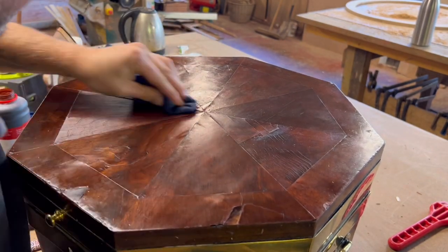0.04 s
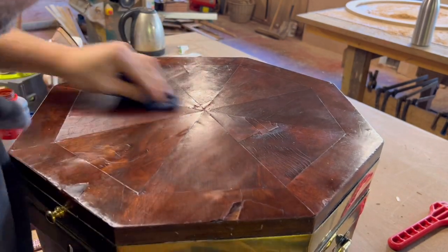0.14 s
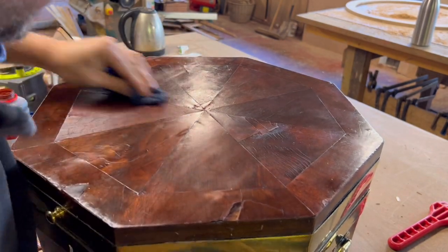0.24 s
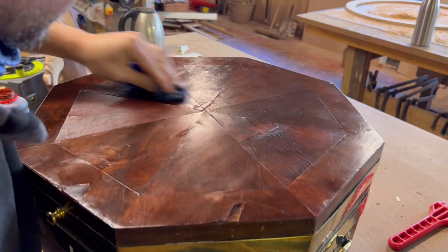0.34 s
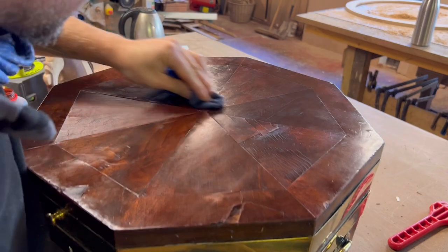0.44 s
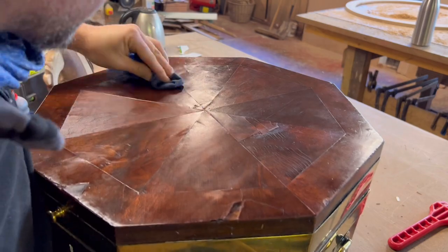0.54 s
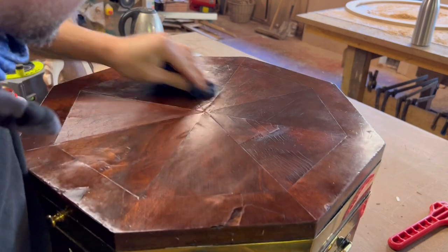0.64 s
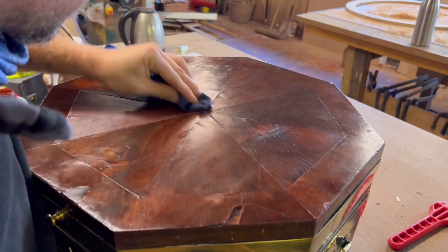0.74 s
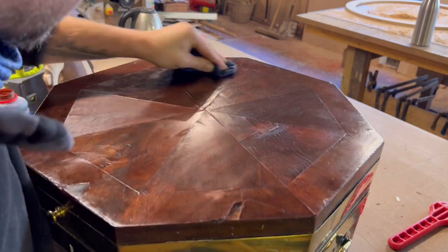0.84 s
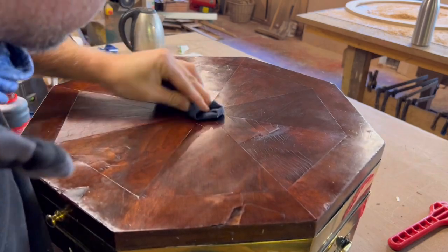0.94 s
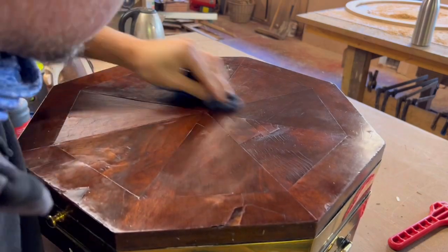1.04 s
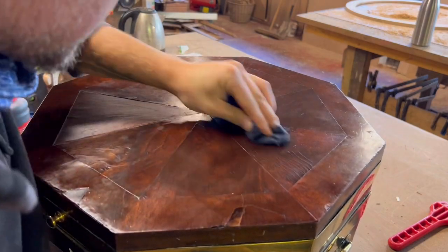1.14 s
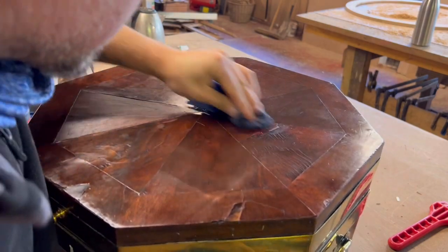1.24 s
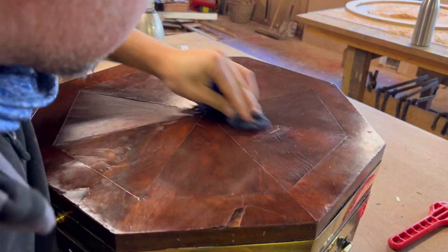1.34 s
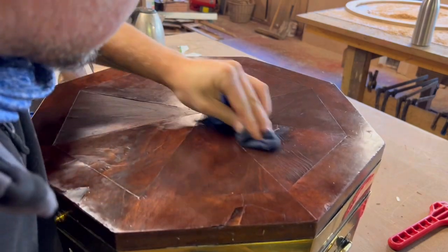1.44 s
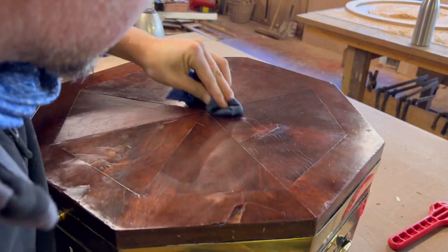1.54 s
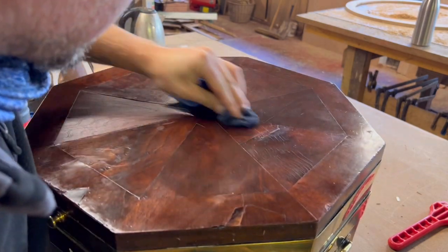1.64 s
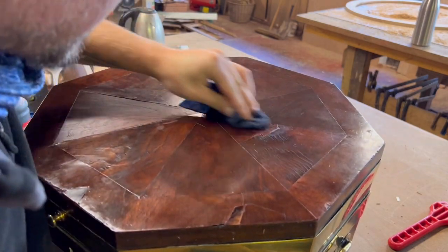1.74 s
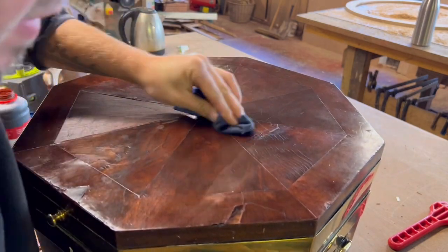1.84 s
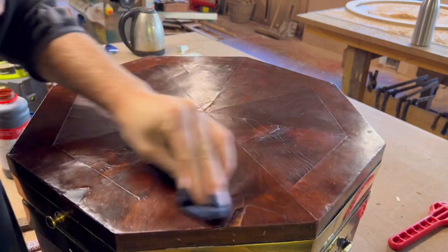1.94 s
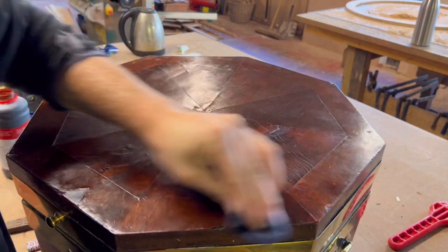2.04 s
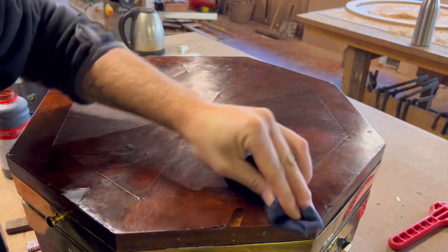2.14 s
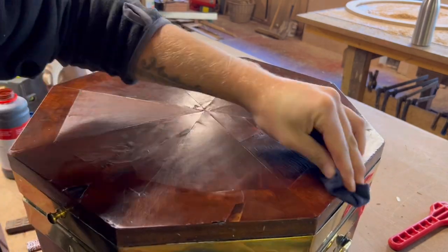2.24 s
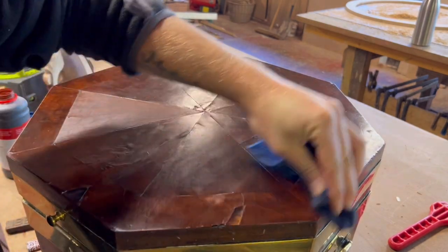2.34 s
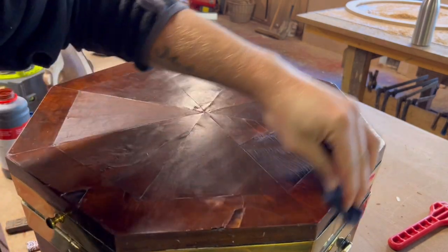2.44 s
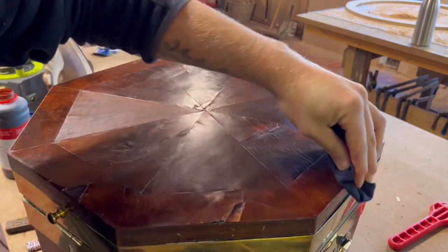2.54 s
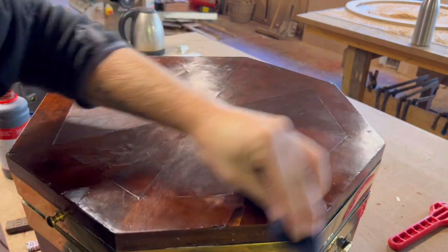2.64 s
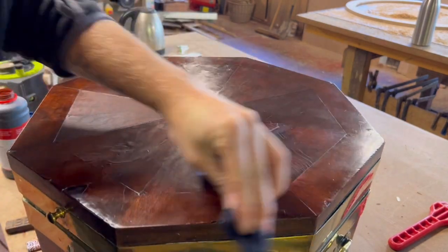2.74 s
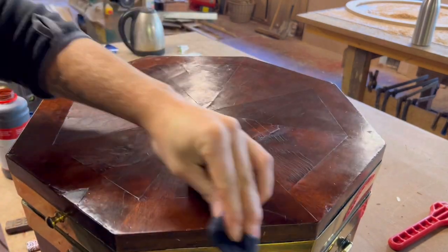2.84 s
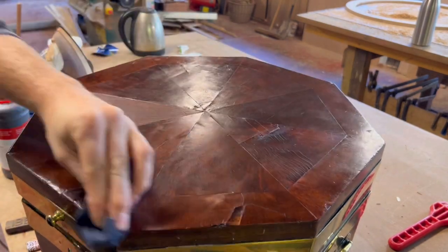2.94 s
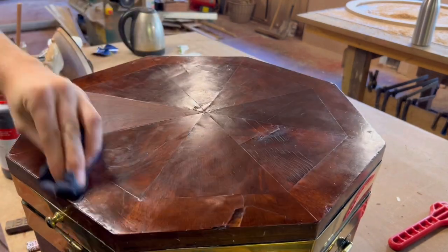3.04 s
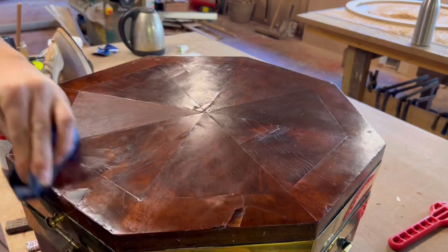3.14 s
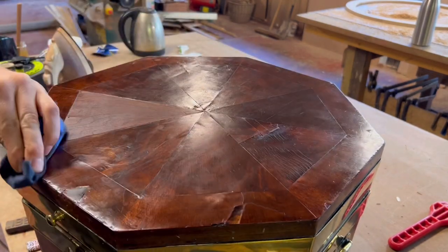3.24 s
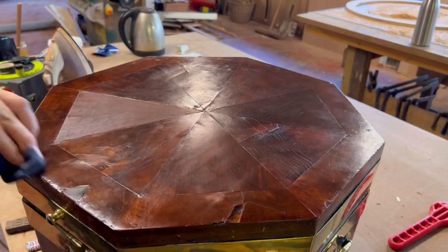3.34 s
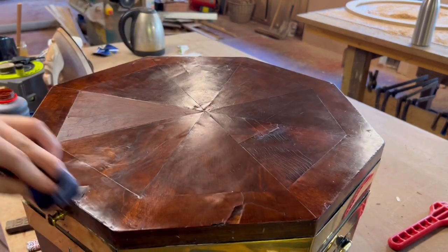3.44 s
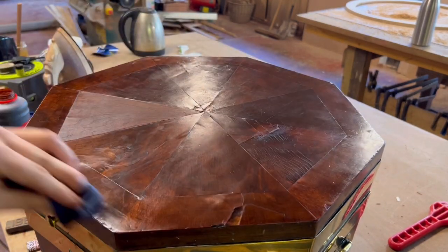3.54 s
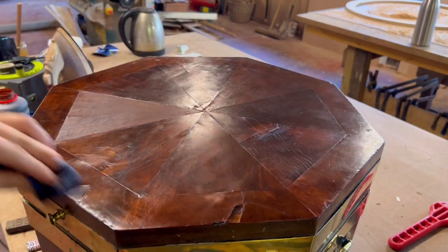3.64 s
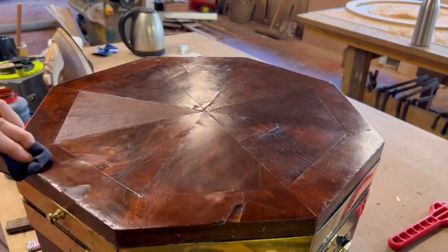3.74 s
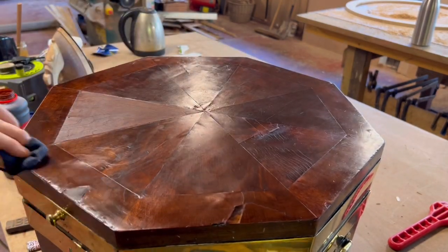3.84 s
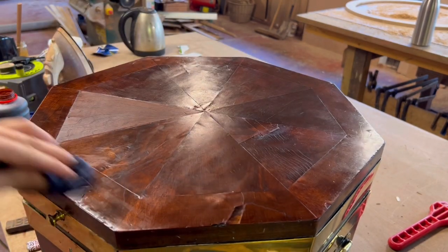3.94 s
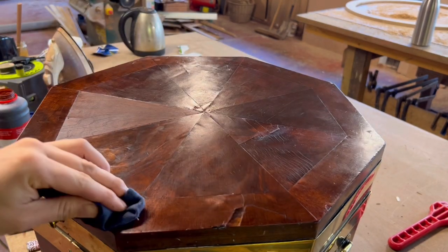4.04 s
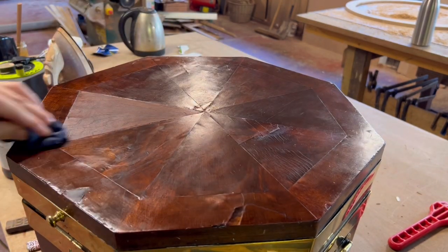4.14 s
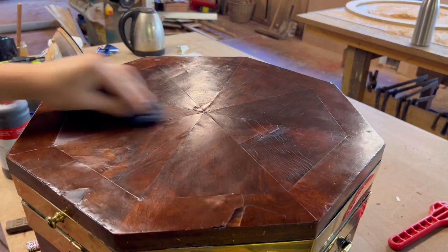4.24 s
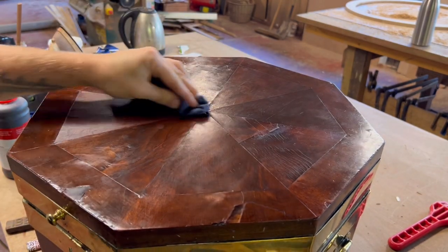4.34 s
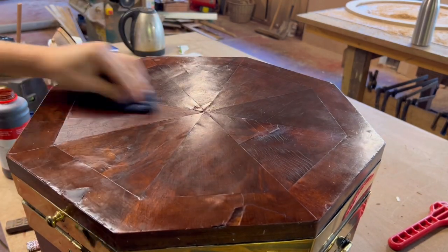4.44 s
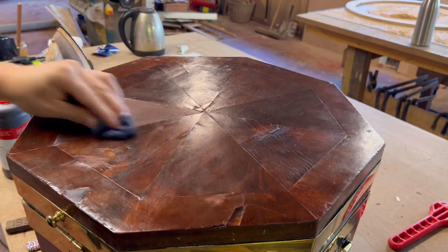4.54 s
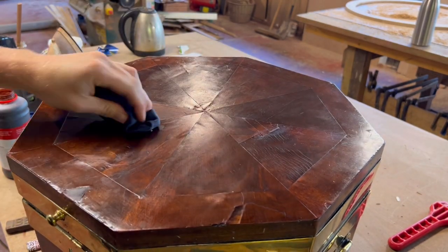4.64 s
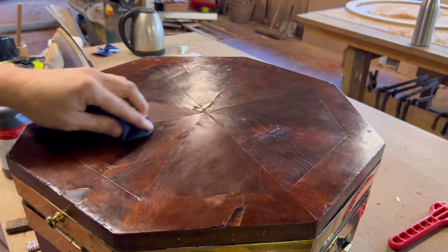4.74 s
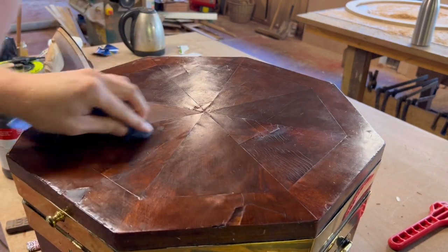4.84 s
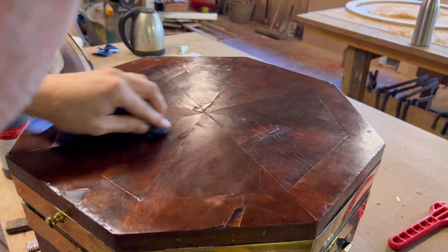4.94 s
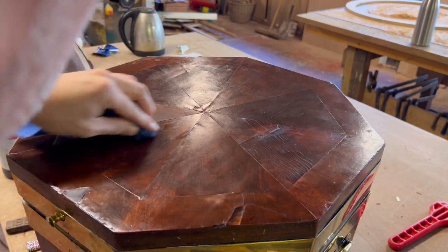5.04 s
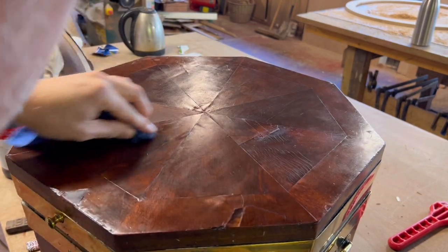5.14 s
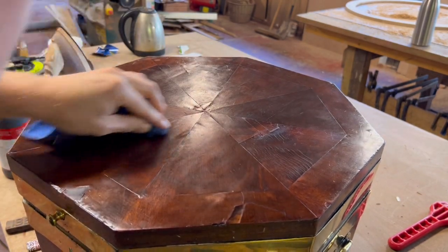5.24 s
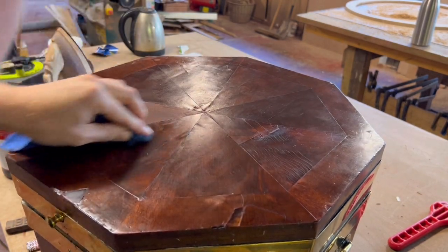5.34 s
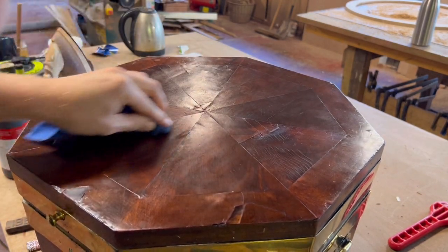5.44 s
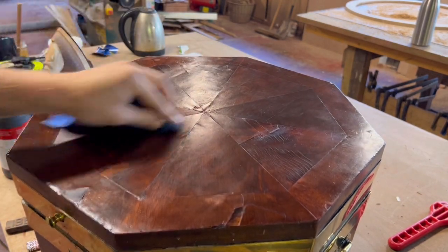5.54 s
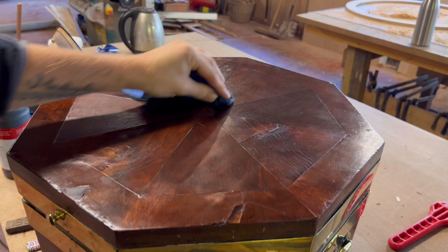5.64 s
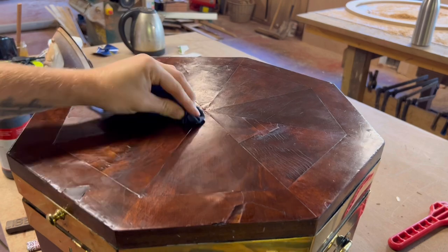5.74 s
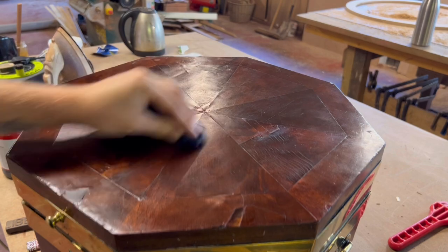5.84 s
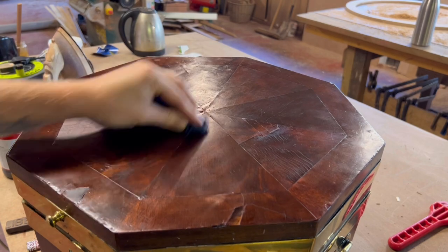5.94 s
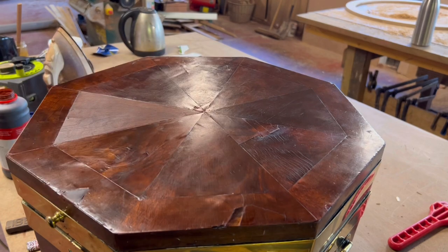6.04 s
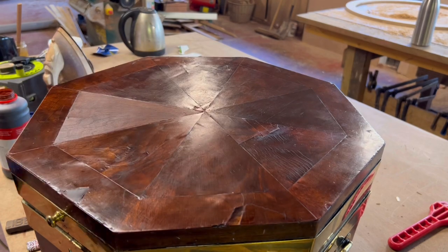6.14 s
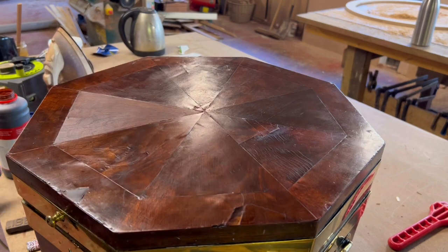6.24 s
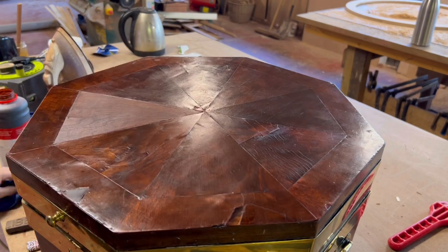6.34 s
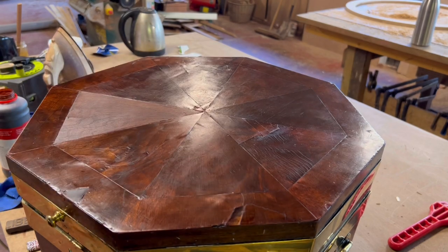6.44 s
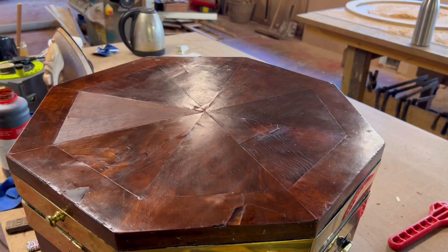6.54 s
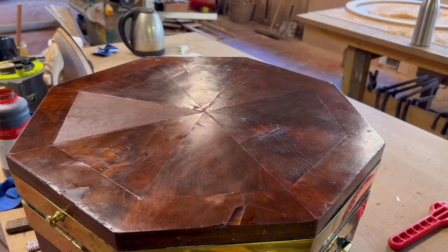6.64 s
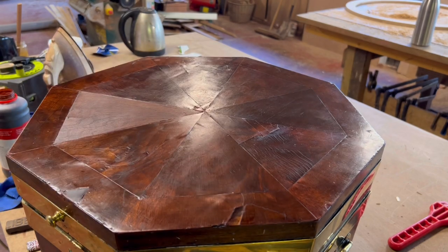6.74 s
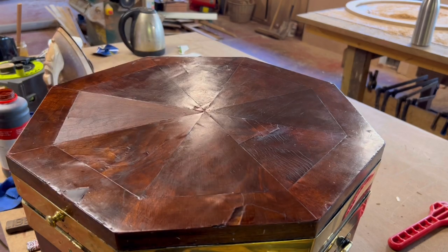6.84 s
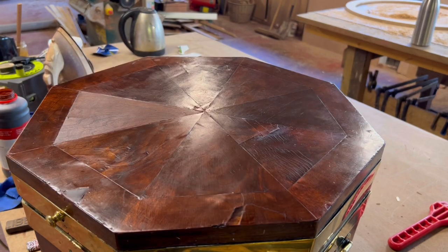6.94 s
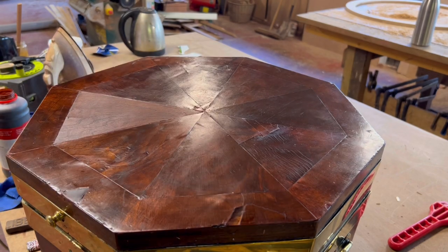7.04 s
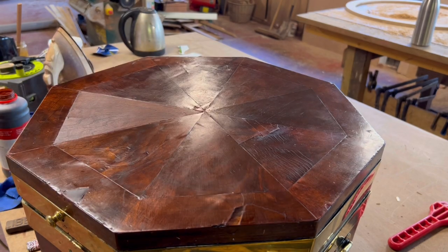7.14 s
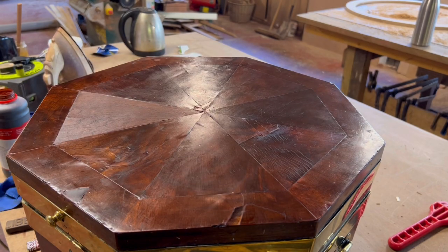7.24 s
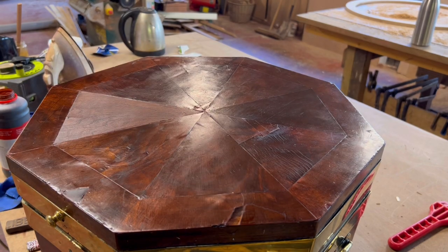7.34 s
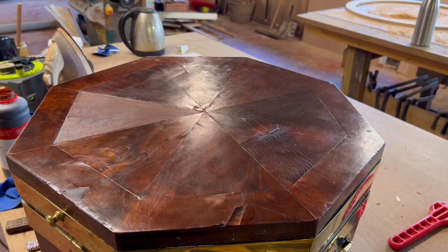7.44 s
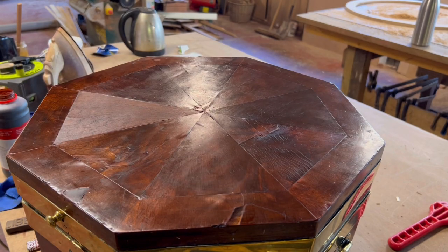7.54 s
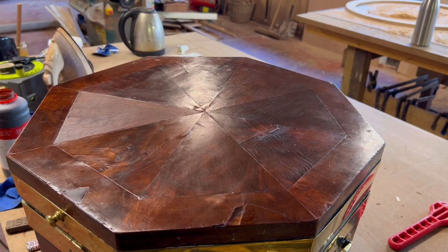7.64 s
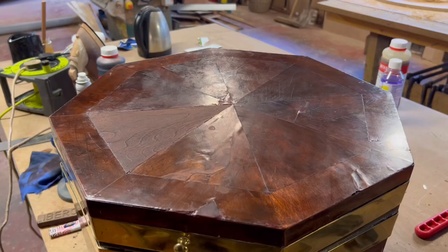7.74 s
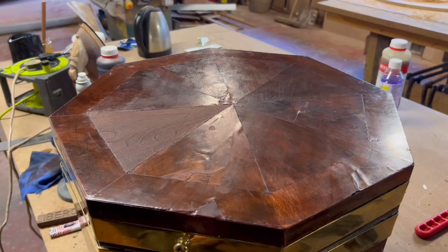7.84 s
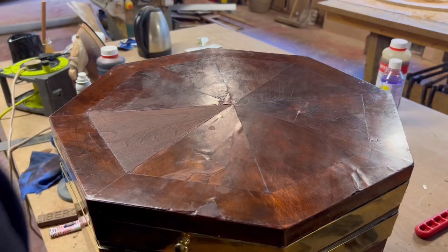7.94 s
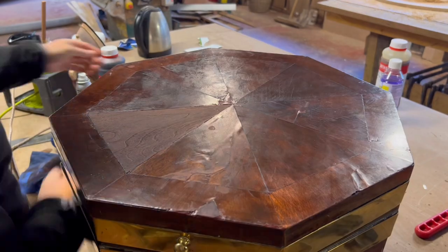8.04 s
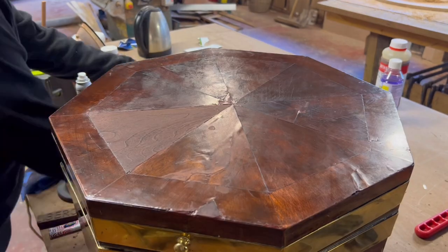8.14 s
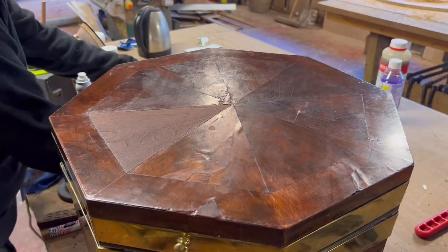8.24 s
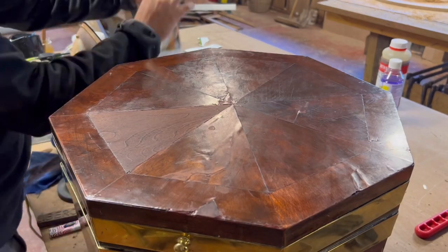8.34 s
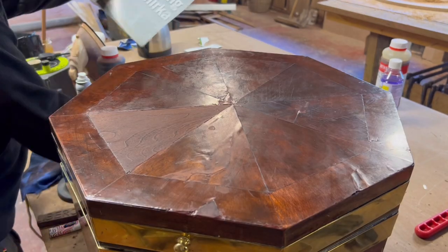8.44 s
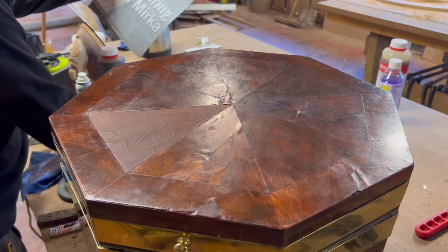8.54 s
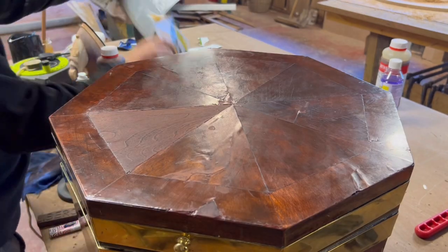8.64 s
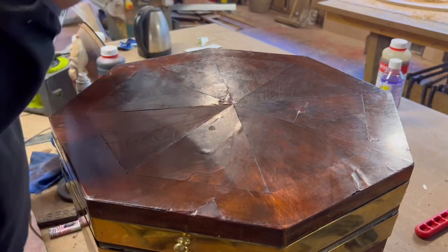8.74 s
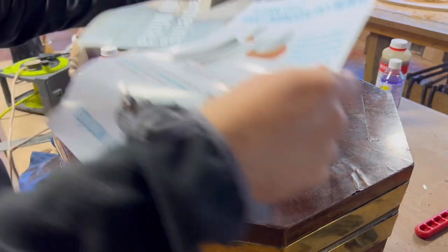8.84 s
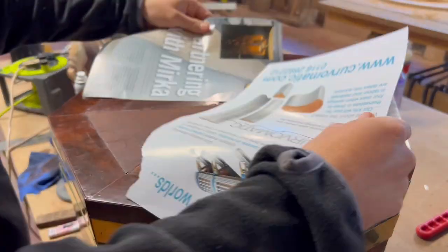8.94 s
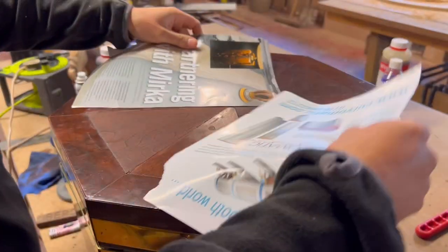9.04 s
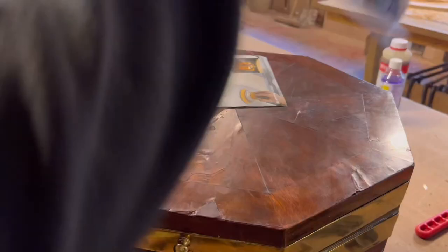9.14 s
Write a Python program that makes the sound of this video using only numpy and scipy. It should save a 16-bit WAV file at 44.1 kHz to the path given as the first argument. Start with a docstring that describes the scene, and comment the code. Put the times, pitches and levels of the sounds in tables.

```python
"""In a quiet workshop, a two-port phone lies close to a varnished wooden cabinet scrubbed with a cloth pad.
Very quick strokes of filtered noise hiss; stick-slip pulses drag the wood into a rumble through its modes.
The cabinet rocks: struck modes and clicks make drawer knocks, clacks, rebounds, rattles, bumps and chinks.
Short bursts tick now and then throughout; after the rubbing stops, noise swells make sleeves and paper rustle.
A faint room hum runs under it all, and short tails of noise answer from the table top and the room."""
import sys
import numpy as np
from scipy import signal
from scipy.fft import rfft, irfft, next_fast_len
from scipy.io import wavfile
from scipy.ndimage import uniform_filter1d

SR = 44100
rng = np.random.default_rng(int(sys.argv[2]) if len(sys.argv) > 2 else 0)


def dump_mix(stems):
    """Bounce the given channels to the path in sys.argv[1] as a 16-bit WAV at rate SR."""
    frames = np.atleast_2d(stems).T  # one column per channel
    limited = np.clip(frames, -1, 1)  # hard clip at full scale
    pcm = np.round(limited * 32767).astype(np.int16)
    wavfile.write(sys.argv[1], SR, pcm)


N = 405279
T = np.arange(N) / SR
FAST = next_fast_len(N)


def undb(db):
    """Decibels to amplitude."""
    return 10 ** (np.asarray(db) / 20)


def unit(x):
    """Scale to an RMS of 1."""
    return x / np.sqrt(np.mean(x ** 2))


def colour(x, spectrum):
    """Shape a sound by (frequency_hz, level_db) points, joined on a log frequency axis."""
    hz, db = np.transpose(spectrum)
    f = np.fft.rfftfreq(FAST, 1 / SR) + 1
    gain = undb(np.interp(np.log(f), np.log(hz), db))
    return irfft(rfft(x, FAST) * gain, FAST)[..., :N]


def band(x, lo_hz, hi_hz):
    """Keep the band between two frequencies, with gentle slopes."""
    edges_hz = [lo_hz, min(hi_hz, .45 * SR)]
    return signal.sosfilt(signal.butter(2, edges_hz, "bandpass", fs=SR, output="sos"), x)


def decay(t60):
    """Factor per sample that loses 60 dB in t60 seconds."""
    return np.exp(-np.log(1000) / (t60 * SR))


def ring(x, hz, t60):
    """One decaying mode; a unit impulse gives a sine that starts near height 1."""
    r, w = decay(t60), 2 * np.pi * hz / SR
    return signal.lfilter([0, np.sin(w)], [1, -2 * r * np.cos(w), r * r], x)


def spikes(s, size):
    """Single-sample impulses at the times s."""
    x = np.zeros(N)
    np.add.at(x, (np.asarray(s) * SR).astype(int), size)
    return x


def burst(s, db, t60):
    """Noise puffs that start at s and die away."""
    envelope = signal.lfilter([1], [1, -decay(t60)], spikes(s, undb(db)))
    return rng.standard_normal(N) * envelope


def grit(per_s, spread_db):
    """Scattered slips of very uneven size."""
    size_db = spread_db * np.minimum(rng.exponential(size=N), 4.0)
    return (rng.random(N) < per_s / SR) * rng.standard_normal(N) * undb(size_db)


def walk(rate):
    """Random levels held 1 / rate s and slewed; spread near 1."""
    k = int(SR / rate)
    held = np.repeat(rng.standard_normal(N // k + 1), k)
    return 1.38 * uniform_filter1d(held, k)[:N]


def spread(own):
    """Noise from a wide source: part reaches both ports alike, part only one."""
    return (rng.standard_normal(N) + own * rng.standard_normal((2, N))) / np.sqrt(1 + own ** 2)


def swell(start, top, end):
    """Rise to the top, then fall away, with a shortest rise of 8 ms and fall of 24 ms."""
    top = max(top, start + .008)
    return np.interp(T, [start, top, max(end, top + 0.024)], [0, 1, 0]) ** 1.91


def bending(x, late_s=0.002733):
    """Bending waves in a board: the lows travel slower, so a blow arrives as a falling chirp."""
    f = np.fft.rfftfreq(FAST, 1 / SR)
    phase = 2 * np.pi * late_s * (2 * np.sqrt(500 * f) - f / 4)
    return irfft(rfft(x, FAST) * np.exp(-1j * phase), FAST)[..., :N]


# spectrum of the room air: frequency_hz [Hz], level_db [relative dB per Hz]
HUM_SPECTRUM = [(24, -75), (40, -49.5), (176, 2.5), (402, 0.5), (990, -13.5), (1630, -12), (2630, -22),
                (13400, -29.5), (16000, -36)]


def hum():
    """Faint air and distant machines: coloured noise, partly different at each port, slowly wavering."""
    mid, left, right = (colour(rng.standard_normal(N), HUM_SPECTRUM) for _ in range(3))
    sides = band(np.array([left, right]), 460.0, 17000.) * undb(1.0)
    return unit(mid + sides) * undb(-75.0 + 1.6 * walk(7.7))


def room(x, t60, wet_db, same_db):
    """Surfaces answer with a short noise tail, unlike in the two ports in the treble."""
    t = np.arange(int(.3 * SR)) / SR
    tail = rng.standard_normal((3, len(t))) * np.exp(-np.log(1000) * t / t60) * (t > .001)
    treble = signal.sosfilt(signal.butter(2, 1400., "high", fs=SR, output="sos"), tail[1:])
    wet = (undb(same_db) * tail[0] + treble) * undb(wet_db) / np.sqrt(np.sum(tail[0] ** 2))
    return signal.fftconvolve(x[None], wet, axes=1)[:, :N]


# spectrum of creasing paper: frequency_hz [Hz], level_db [relative dB per Hz]
PAPER_SPECTRUM = [(880, -47), (1500, 0), (2770, -1.5), (3180, -2), (9650, -8), (14200, -10.5), (16000, -15)]
# sleeves and paper swish: start_s [s], loudest_s [s], end_s [s, swell() sets a shortest fall],
# rustle_db [dB], body_db [dB]
SWISHES = [(6.093, 6.249, 6.37, -58.5, -61.5), (6.463, 6.526, 6.67, -64.5, -64),
           (6.558, 6.633, 6.65, -55, -66.5), (6.751, 6.783, 6.83, -62.5, -54.5),
           (6.856, 6.896, 7.77, -70, -65.5), (7.04, 7.069, 6.38, -58, -84.5), (7.7, 7.796, 8, -71.5, -82.5),
           (7.854, 7.895, 7.76, -67, -74.5), (8.057, 8.094, 8, -46.5, -69.5),
           (8.097, 8.14, 8.4, -65, -70.5), (8.28, 8.363, 8.43, -58, -66.5), (8.405, 8.439, 8.49, -66, -78),
           (8.53, 8.547, 9.06, -62.5, -65), (8.657, 8.672, 8.71, -50, -52.5),
           (8.673, 8.71, 8.32, -51.5, -62), (8.748, 8.8, 9.1, -80, -75.5), (8.837, 8.927, 8.96, -62.5, -65),
           (8.95, 9.01, 9.04, -67, -82), (9.046, 9.078, 8.56, -56, -66), (9.058, 9.168, 10, -66.5, -66)]
# ribbed cloth squeaks: start_s [s], end_s [s], pitch_hz [Hz], level_db [dB]
SQUEAKS = [(6.157, 6.28, 1370, -54.5), (6.167, 6.294, 2690, -59), (6.844, 6.98, 4500, -60.5)]


def rustle():
    """Cloth and paper: dense creasing grains over a soft body; ribbed cloth squeaks in narrow bands."""
    creases = unit(grit(1500, 2.6))
    grains = colour(spread(2.6) + 0.46 * creases, PAPER_SPECTRUM) * undb(2.0 * walk(50))
    bright = unit(band(band(grains, 5100.0, 19000.), 3900.0, 19000.))
    middle = unit(band(grains, 2060.0, 4700.0))
    body = unit(band(spread(0.45), 187.0, 1170.0)) * undb(2.9 * walk(40))
    out = 0
    for start, top, end, db, body_db in SWISHES:
        middle_db = (db + body_db) / 2 - 2.0  # between the crisp and the heavy part
        mix = undb(db) * bright + undb(middle_db) * middle + undb(body_db) * body
        out = out + swell(start, top, end) * mix
    for start, end, hz, db in SQUEAKS:
        squeak = unit(band(rng.standard_normal(N), hz * 0.866, hz * 1.09))
        out = out + swell(start, (start + end) / 2, end) * undb(db) * squeak
    return out


# dry ticks of grit, handles and paper creases: start_s [s], level_db [dB, of the crack],
# thud_db [dB re crack, before a common boost], treble_db [dB re crack, above 7 kHz]
TICKS = [(0.4472, -30, 1.5, -1.5), (0.5826, -26.5, -12, -4), (0.843, -33, -3, -7), (1.083, -25, -16, 3),
         (1.1482, -28, -3.5, -1), (1.8063, -27.5, -2.5, 1.5), (1.9406, -39.5, -12, -6),
         (2.2839, -29, 0.5, -3), (4.378, -35, -7, -7), (4.691, -43.5, -25, -17), (5.6428, -29.5, -7.5, -3),
         (6.473, -58, 0, 0.5), (6.629, -43, -0.5, 0), (6.762, -40.5, -18, -7), (6.869, -60, -17, -7),
         (7.0514, -42, -7.5, 0), (7.3342, -55, -14, 1), (7.87, -58.5, 0, -13), (8.0356, -64.5, 5.5, -11),
         (8.21, -49, -24.5, -10.5), (8.304, -51.5, -29.5, 4.5), (8.3475, -53, -25.5, 6),
         (8.4656, -63.5, 8, 2), (8.5407, -43.5, -17.5, -11), (8.561, -55, -24, -8),
         (8.5867, -31, -14.5, -3), (8.664, -29, -19, -9), (8.697, -39, -15, -3), (8.8495, -49.5, -11, 1),
         (8.873, -53, -17, -8), (8.9, -52.5, -5, -9), (8.9731, -36.5, -17.5, -13), (9.062, -51, -21, -4),
         (9.083, -41, -19, -12), (9.0946, -44.5, -9.5, 0), (9.101, -60, -2, -10)]


def ticks():
    """Decaying noise bursts: a sharp crack, bright or dull, a duller tail and a small thud."""
    s, db, thud_db, treble_db = np.transpose(TICKS)
    crack_s = .007  # t60
    crack = band(burst(s, db, crack_s), 1800., 7000.0)
    crack = crack + band(burst(s, db + treble_db, crack_s), 7000., 15000.0)
    tail = band(burst(s, db - 12.0, 0.059), 2000.0, 7100.0)
    thud = band(burst(s, db + thud_db + 11.0, 0.13), 250., 1175.0)
    return crack + tail + thud


# dull low bumps: start_s [s], level_db [dB, before the modes]
BUMPS = [(3.606, -35), (3.849, -34), (5.773, -28.5), (5.872, -27), (8.471, -61), (8.631, -53),
         (8.769, -50.5), (9.09, -55)]
# modes of a bump: pitch_hz [Hz], level_db [relative dB], t60_s [s]
BUMP_MODES = [(192, -11.5, 0.095), (267.6, -1.5, 0.081), (360, -6, 0.048)]


def bumps():
    """A soft push with no edge: low modes that each start a few ms early or late."""
    s, db = np.transpose(BUMPS)
    chance = rng.standard_normal((len(s), len(BUMP_MODES)))
    rings = 0
    for k, (hz, mode_db, t60) in enumerate(BUMP_MODES):
        rings = rings + ring(spikes(s + 0.00273 * chance[:, k], undb(db + mode_db)), hz, t60)
    return band(rings, 216.0, 540.0)


# a small brass handle chinks: start_s [s], level_db [dB, before the modes]
CHINKS = [(2.366, -38.5), (2.4274, -34), (2.473, -47), (2.488, -36), (2.5343, -43), (3.007, -42),
          (3.062, -52), (3.121, -41.5), (3.46, -47)]
# modes of the handle: pitch_hz [Hz], level_db [relative dB], t60_s [s]
HANDLE_MODES = [(1690, -1, 0.021), (2050, -6, 0.018), (3500, -11, 0.011)]


def chinks():
    """Short bright modes of the struck handle, mixed anew each time."""
    s, db = np.transpose(CHINKS)
    chance = rng.standard_normal((len(s), len(HANDLE_MODES)))
    rings = 0
    for k, (hz, mode_db, t60) in enumerate(HANDLE_MODES):
        rings = rings + ring(spikes(s, undb(db + mode_db + 3.4 * chance[:, k])), hz, t60)
    return band(rings, 1300.0, 3900.0)


# soft drawer knocks: start_s [s], level_db [dB, before the trim]
KNOCKS = [(.02, -22), (.063, -16), (0.111, -17), (0.153, -17.5), (.241, -21), (.281, -22), (.307, -20),
          (.355, -13.5), (.374, -16), (.425, -12.5), (.494, -15), (0.568, -17.5), (0.608, -20.5),
          (.645, -18), (.729, -21.5), (.783, -22), (0.857, -22), (0.874, -13.5), (0.932, -13), (.988, -16),
          (1.085, -16), (1.137, -16), (1.176, -21), (1.207, -18.5), (1.238, -17), (1.281, -13.5),
          (1.319, -26), (1.354, -14), (1.392, -26), (1.426, -11), (1.462, -18), (1.497, -12.5), (1.57, -17),
          (1.607, -23), (1.647, -16.5), (1.717, -13.5), (1.786, -19), (1.808, -11), (1.987, -27.5),
          (2.281, -25), (2.342, -28), (2.445, -29.5), (2.496, -25.5), (2.558, -29), (2.628, -34),
          (2.763, -26.5), (3.176, -31.5), (3.284, -30.5), (3.48, -34), (4.23, -22.5), (4.353, -26.5),
          (4.494, -32.5), (4.643, -31), (4.822, -30.5), (5.556, -25), (5.644, -18), (5.875, -23)]
# pitch of the struck place over time: time_s [s], pitch_hz [Hz]
KNOCK_PITCH = [(0, 490), (0.5, 476), (1.1, 420), (1.85, 430), (2.4, 492), (2.8, 600), (3.3, 476),
               (4.2, 593), (4.5, 482), (5.9, 460)]
# hard clacks of the cabinet rocking onto a stop: start_s [s], level_db [dB, before the modes]
CLACKS = [(1.083, -16), (2.049, -23), (2.21, -33), (2.861, -25), (4.792, -25.5), (4.863, -16), (4.928, -13),
          (4.995, -12), (5.057, -12), (5.121, -11.5), (5.184, -13), (5.249, -14.5), (5.315, -12.5),
          (5.38, -12), (5.444, -12.5), (5.513, -15)]
# softer rebounds as the cabinet falls back: start_s [s], level_db [dB, before the modes]
REBOUNDS = [(4.8869, -28), (4.8938, -22.5), (4.9524, -21.5), (4.9611, -21.5), (5.014, -22.5),
            (5.0245, -16.5), (5.0792, -20), (5.0894, -17), (5.1437, -20.5), (5.154, -18.5), (5.209, -25),
            (5.217, -20.5), (5.2735, -28.5), (5.2812, -19.5), (5.297, -26), (5.3395, -24), (5.3464, -21.5),
            (5.405, -27), (5.412, -21), (5.472, -29), (5.4793, -21), (5.5751, -32)]


def blows_of_drawers():
    """Rows of (start_s, level_db, pitch_hz, edge_db, bounce_db) for knocks, clacks and rebounds."""
    hard, early, weak = rng.standard_normal((len(KNOCKS), 3)).T
    s, db = np.transpose(KNOCKS)
    hz = np.interp(s, *np.transpose(KNOCK_PITCH))
    edge_db = -22 + 3 * hard  # hard edge relative to the blow
    knock = np.c_[s, db - 1.5, hz, edge_db, 0 * s - 12.0]
    # a drawer lands one corner first, so the knock swells in
    corner_s = s - .0035 - .0012 * early
    corner = np.c_[corner_s, db - 8.0 + 1.5 * weak, hz, edge_db - 6.0, 0 * s - 4.0]
    # gentler clacks have a duller edge
    clacks = [(start, level, 670, -6.5 + .6 * (level + 13), -20.0) for start, level in CLACKS]
    rebounds = [(start, level, 562, -11, -14.0) for start, level in REBOUNDS]
    return np.r_[knock, corner, clacks, rebounds]


# cabinet modes, also used by pad(): pitch_hz [Hz], level_db [relative dB], t60_s [s, before shortening]
CABINET_MODES = [(272, -15.5, 0.37), (307, -23, 0.45), (418.5, -4, 0.16), (460.6, 0, 0.071),
                 (557.4, 1.5, 0.055), (632, 2, 0.056), (783, -6.5, 0.034), (909, -6.5, 0.041)]
# drawer front modes, also used by pad(): pitch_hz [Hz], level_db [relative dB], t60_s [s]
FRONT_MODES = [(960, -4, 0.019), (1127, -0.5, 0.048), (1216, 1, 0.022), (1435, -3, 0.021),
               (1640, -10.5, 0.027)]
# modes of the hard edge: pitch_hz [Hz], width_hz [Hz], level_db [relative dB]
EDGE_MODES = [(1290, 310, -6.5), (1490, 230, 0.5), (1699, 110, 3.5), (2030, 190, -3), (2297, 150, -0.5),
              (2840, 160, -2.5), (3256, 200, -5), (3620, 500, -3), (4370, 260, -10), (6900, 2500, -15.5)]
# a thin drawer front rattles: start_s [s], level_db [dB, before the trim]
RATTLES = [(0.0755, -27), (0.163, -25.5), (0.255, -29), (0.3309, -26), (0.4, -26), (0.471, -26),
           (0.5374, -23.5), (0.622, -22), (0.6984, -25.5), (0.773, -21), (0.842, -25), (0.9172, -20),
           (0.974, -20), (1.0355, -28.5), (1.0821, -20), (1.266, -28), (1.337, -32.5), (1.4262, -29.5),
           (1.4765, -30), (1.5458, -29), (1.809, -29), (1.939, -37), (2.027, -40), (2.4434, -32),
           (2.498, -39), (2.559, -35.5), (2.7618, -26.5), (2.8131, -36), (5.68, -38), (5.754, -37.5),
           (3.8457, -30.5)]


def knocks():
    """Blows ring the cabinet modes nearest their pitch and a hard edge; rattles ring the drawer front."""
    s, db, hz, edge_db, bounce_db = blows_of_drawers().T
    # each blow bounces once; the bounce has a weaker edge
    late, uneven = rng.standard_normal((len(s), 2)).T
    bounce_db = db + 1.5 * uneven + bounce_db
    s, db = np.r_[s, s + .012 + .003 * late], np.r_[db, bounce_db]
    hz, edge_db = np.r_[hz, hz], np.r_[edge_db, edge_db - 5.0]

    chance = rng.standard_normal((len(s), len(CABINET_MODES)))
    out = 0
    for k, (mode_hz, mode_db, t60) in enumerate(CABINET_MODES):
        octaves = np.log2(mode_hz / hz)
        near_db = np.where(octaves > 0, -14.0, 24.0) * octaves + 1.6 * chance[:, k]
        out = out + ring(spikes(s, undb(db + mode_db + near_db - 6.0)), mode_hz, 0.67 * t60)
    # wood on wood is a rounded push
    out = signal.sosfilt(signal.butter(2, 1300., fs=SR, output="sos"), out)

    click = spikes(s, undb(db + edge_db + 16.0))
    out = out + band(band(click, 900., 4400.0), 700., 5200.)
    for k, (mode_hz, width_hz, mode_db) in enumerate(EDGE_MODES):
        edge = spikes(s, undb(db + edge_db + mode_db - 10.5))
        out = out + (-1) ** k * ring(edge, mode_hz, 2.6 / width_hz)

    # the blows shake the front too, and after each rattle it chatters on
    rattle_s, rattle_db = np.transpose(RATTLES)
    shakes = spikes(rattle_s, undb(rattle_db - 4.0)) + spikes(s, undb(db - 28.5))
    again = rng.random((len(RATTLES), 6)).T
    chatter_s, chatter_db = rattle_s + .004 + 0.024 * again[:3], rattle_db - 13.0 - 5.0 * again[3:]
    shakes = shakes + spikes(chatter_s, undb(chatter_db))
    shakes = band(band(shakes, 390.0, 2600.0), 390.0, 2600.0)
    for mode_hz, mode_db, t60 in FRONT_MODES:
        out = out + undb(mode_db) * ring(shakes * undb(3.0 * walk(40)), mode_hz, t60)
    out = out + undb(10.5) * band(shakes, 820.0, 1700.)

    # small boards radiate no bass
    out = signal.sosfilt(signal.butter(6, 270., "high", fs=SR, output="sos"), out)
    return bending(out) + band(burst(s, db + edge_db - 10.5, 0.03), 900.0, 4700.0)


# bouts of even strokes, each until the next starts: start_s [s], strokes [count],
# hiss_db [dB, cloth], drag_db [dB, on the wood], sway_db [dB, carcass]; common trims follow
BOUTS = [(-.03, 7, -50.5, -35, -42.5), (0.282, 7, -51, -33, -51), (0.527, 6, -50.5, -35, -38.5),
         (0.761, 4, -50.5, -34, -37.5), (0.902, 4, -50.5, -34, -38.5), (1.101, 3, -58, -42.5, -50),
         (1.211, 7, -51.5, -36, -47), (1.461, 2, -53, -38.5, -45), (1.573, 7, -54, -38, -48.5),
         (1.83, 1, -64, -52, -64), (1.922, 4, -57.5, -47, -51), (2.135, 3, -60.5, -51.5, -58),
         (2.27, 2, -62.5, -40.5, -41.5), (2.389, 1, -66, -43.5, -41), (2.428, 3, -59.5, -38, -44.5),
         (2.537, 4, -64, -45.5, -44), (2.716, 4, -57.5, -45.5, -46), (2.875, 1, -61.5, -51, -55.5),
         (2.992, 6, -55, -51.5, -54), (3.315, 2, -56.5, -46.5, -49.5), (3.442, 2, -55, -45.5, -47.5),
         (3.546, 6, -51.5, -42.5, -44.5), (3.817, 2, -54.5, -49.5, -54), (3.928, 3, -62, -56, -58),
         (4.13, 1, -87, -63, -64), (4.165, 1, -59, -53.5, -73), (4.238, 4, -56, -54, -60),
         (4.495, 1, -57, -54.5, -61), (4.6, 5, -67, -54, -60), (4.825, 5, -61.5, -46, -50.5),
         (5.151, 1, -62.5, -45, -46.5), (5.242, 4, -60.5, -43.5, -46), (5.505, 4, -58.5, -45.5, -49.5),
         (5.721, 4, -59.5, -41.5, -43), (5.902, 2, -60.5, -54.5, -54)]
# hiss above 7 kHz, brighter in the later strokes: time_s [s], level_db [dB]
SHEEN = [(3.9, -1.5), (4.2, 3)]
# spectrum of the cloth hiss: frequency_hz [Hz], level_db [relative dB per Hz]
CLOTH_SPECTRUM = [(900, -24), (1600, -3.5), (2300, -8), (3000, -8), (4200, -9.5), (4600, -7.5), (5100, -10),
                  (9400, -12), (11600, -15), (13000, -11.5), (16000, -20)]
# low modes of the carcass: pitch_hz [Hz], level_db [relative dB], t60_s [s]
CARCASS_MODES = [(117.5, -5, 0.25), (262.7, 6.5, 0.14)]
LIFT_S = 6.048  # the pad leaves the top


def pad():
    """Fibres hiss with the speed of the pad, which slows at each turn; stick-slip drags the cabinet."""
    s, strokes, *levels_db = np.transpose(BOUTS)
    # position counted in strokes
    place = np.interp(T, np.r_[s, LIFT_S], np.r_[0, np.cumsum(np.round(strokes))])
    bout = np.maximum(np.searchsorted(s, T) - 1, 0)
    hiss_gain, drag, sway = (undb(db)[bout] * (T < LIFT_S) for db in levels_db)
    stroke_db = 2.5 * rng.standard_normal(int(place[-1]) + 1)  # strokes differ by chance
    swing = np.abs(np.sin(np.pi * (place % 1) ** .7))  # the pad jerks off and slows down
    speed = (0.12 + swing ** 0.93) * hiss_gain * undb(stroke_db[place.astype(int)])
    speed = uniform_filter1d(speed, size=200)

    sheen_db = np.interp(T, *np.transpose(SHEEN))
    scratch = undb(2.0 * walk(600))  # fibres catch and let go
    hiss = 0
    for hz in 1000 * 2 ** np.arange(0, 4.1, .5):  # each band flickers by itself
        patchy = undb(2.6 * walk(70) + (hz > 7000) * sheen_db)
        hiss = hiss + band(spread(0.96), hz / 1.2, hz * 1.224) * patchy
    hiss = unit(colour(hiss * scratch, CLOTH_SPECTRUM)) * speed * undb(2.0)

    drag, sway = (uniform_filter1d(gain, size=1100) for gain in (drag, sway))  # the hand leans in gradually
    # the soft pad slips in rounded pushes that bunch up in mid-stroke
    slips = band(grit(800, 1.3), 280., 1300.) * (.5 + swing) * undb(2.9 * walk(60))
    wood = 0
    for hz, db, t60 in CABINET_MODES:
        wood = wood + undb(db) * ring(slips * undb(1.5 * walk(50)), hz, 0.6 * t60)
    # lone catches of the cloth pluck one higher mode at a time
    higher_hz = np.geomspace(1350., 2500., num=5)
    plucks = FRONT_MODES + [(hz, -7.0 * np.log2(hz / 900), .022) for hz in higher_hz]
    front = 0
    for hz, db, t60 in plucks:
        catches = band(grit(150, 3.5), hz / 2, hz * 1.4) * swing
        front = front + undb(db) * ring(catches, hz, t60)
    carcass = 0
    for hz, db, t60 in CARCASS_MODES:
        carcass = carcass + undb(db) * unit(ring(rng.standard_normal(N), hz, t60))

    dragged = bending(unit(wood) + undb(-9.5) * unit(front)) * drag * undb(-2.5)
    return hiss, dragged + carcass * sway * undb(-14)


def scene():
    """Every source at the two ports, with answers from the table top and the room."""
    hiss, wood = pad()
    dry = wood + knocks() + chinks() + ticks() + bumps() + hiss + rustle()
    # the bass is a little louder at the right port, the treble at the left
    left = colour(dry[0], [(1100, -1.72), (2000, 0.93)])
    right = colour(dry[1], [(1100, -0.015), (2000, -0.13)])
    mid = dry.mean(axis=0)
    top = room(mid, t60=0.024, wet_db=-7.0, same_db=-24.5)  # table top and hand, close by
    workshop = room(mid, t60=0.19, wet_db=-10.0, same_db=-3.5)
    return np.array([left, right]) + top + workshop + hum()


def record(dry):
    """The phone drops the deep bass and cuts the top."""
    dry = signal.sosfilt(signal.butter(4, 92., "high", fs=SR, output="sos"), dry)
    return signal.sosfilt(signal.ellip(10, .2, 60, 15800, fs=SR, output="sos"), dry)


dry = scene()
out = record(dry)
dump_mix(out)
```